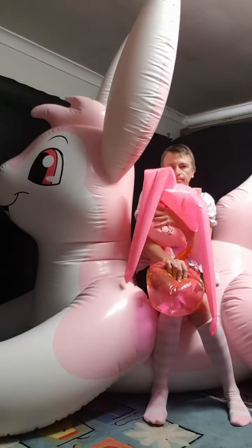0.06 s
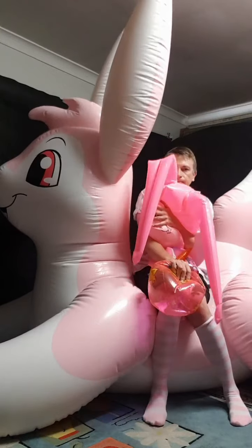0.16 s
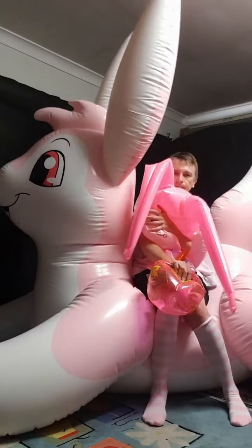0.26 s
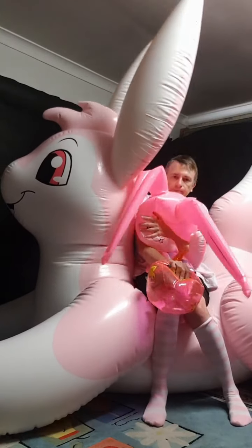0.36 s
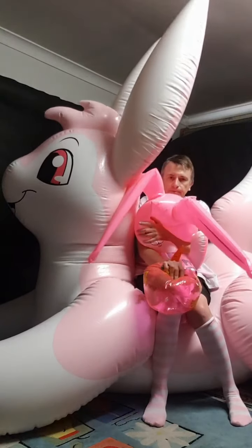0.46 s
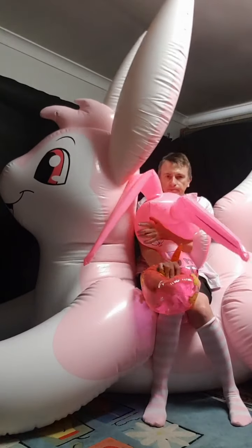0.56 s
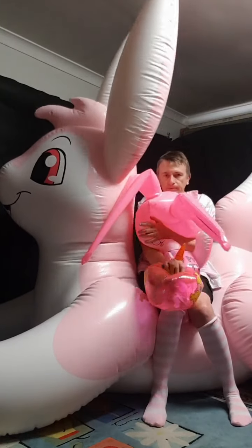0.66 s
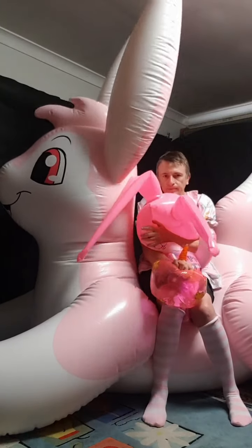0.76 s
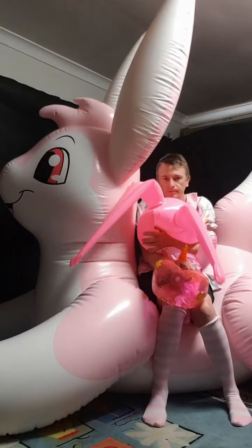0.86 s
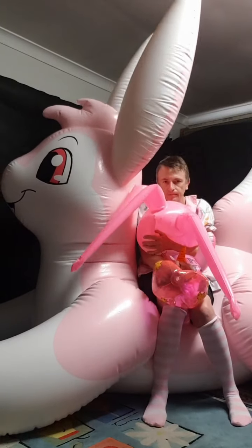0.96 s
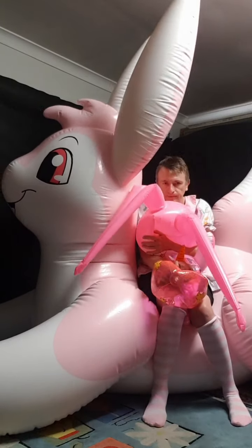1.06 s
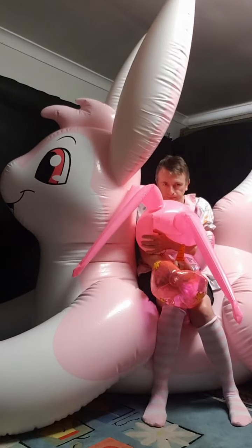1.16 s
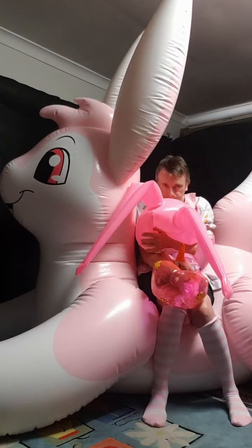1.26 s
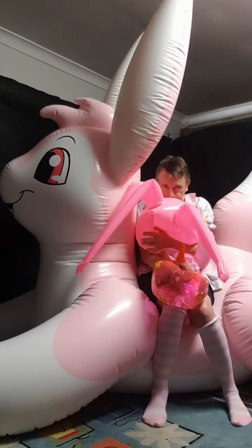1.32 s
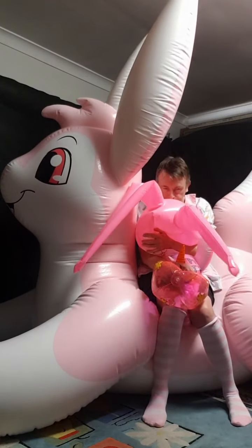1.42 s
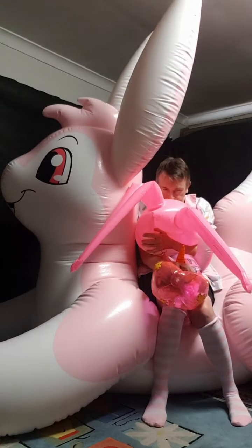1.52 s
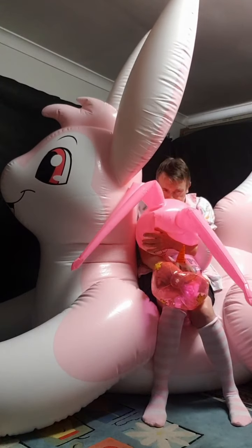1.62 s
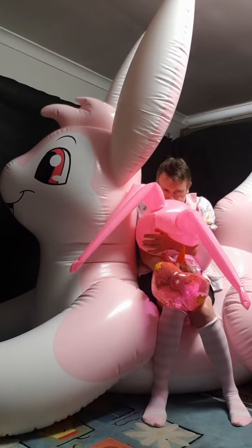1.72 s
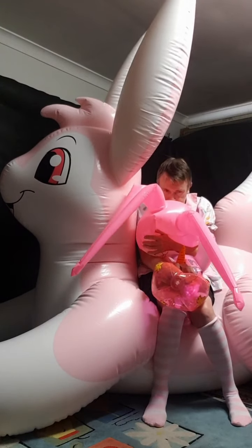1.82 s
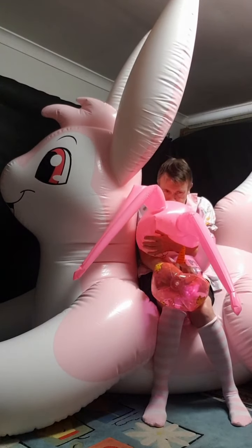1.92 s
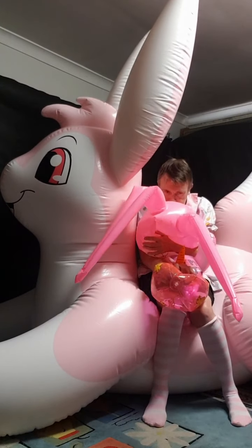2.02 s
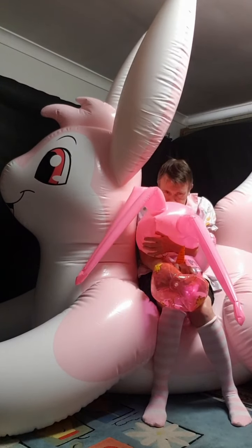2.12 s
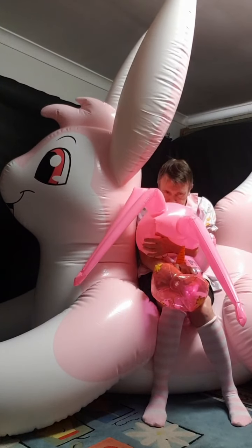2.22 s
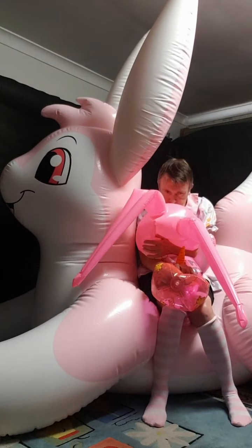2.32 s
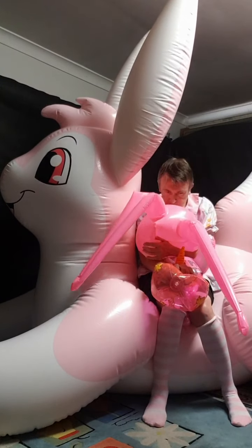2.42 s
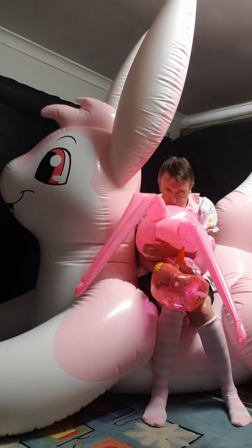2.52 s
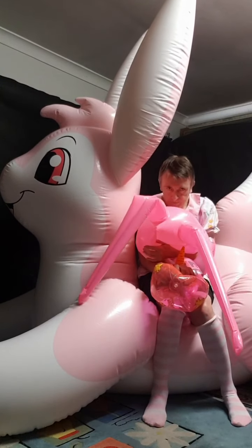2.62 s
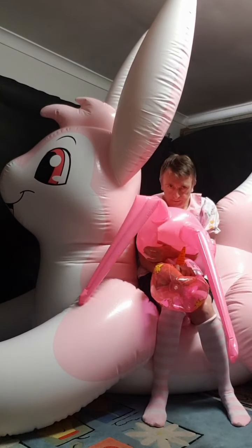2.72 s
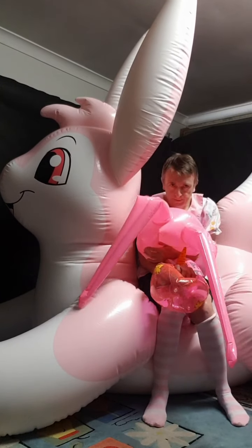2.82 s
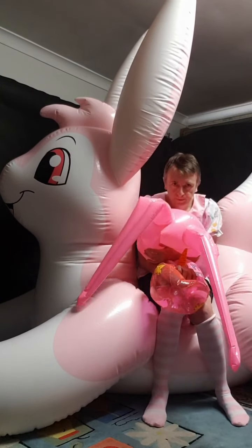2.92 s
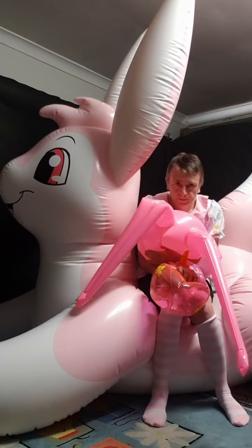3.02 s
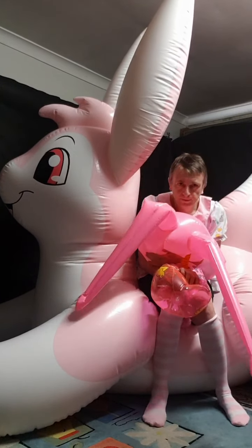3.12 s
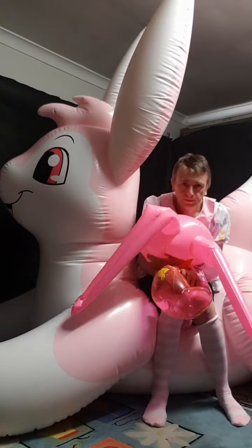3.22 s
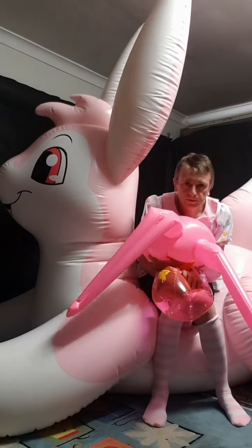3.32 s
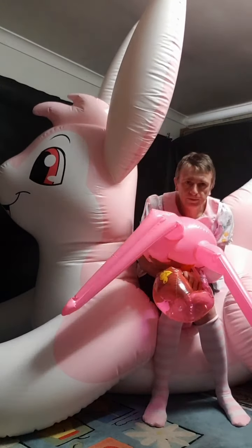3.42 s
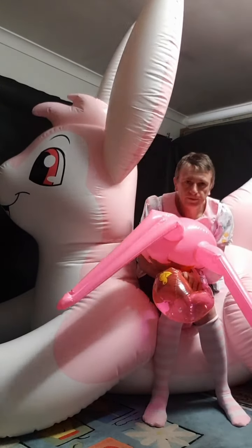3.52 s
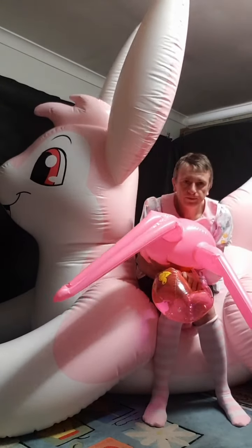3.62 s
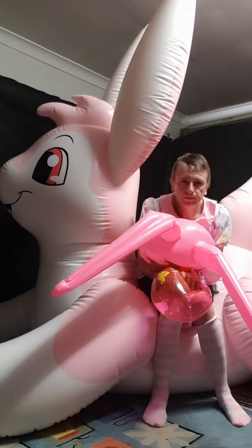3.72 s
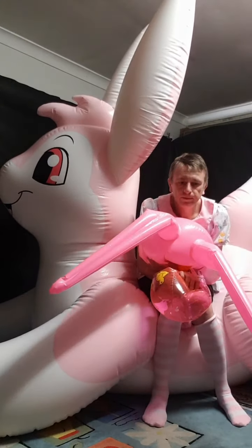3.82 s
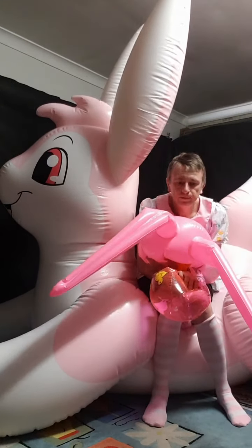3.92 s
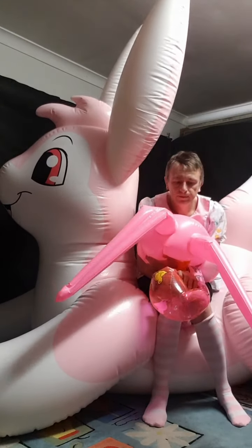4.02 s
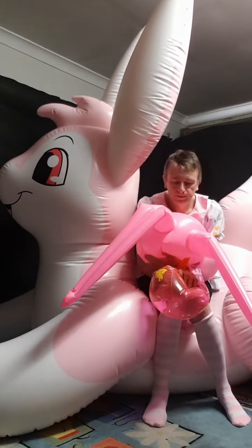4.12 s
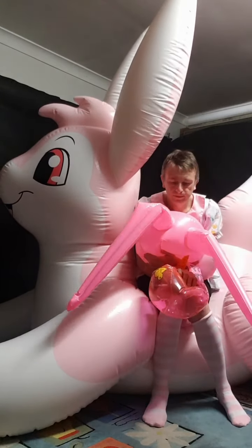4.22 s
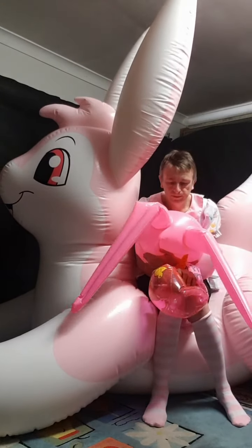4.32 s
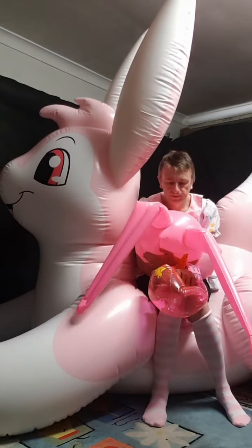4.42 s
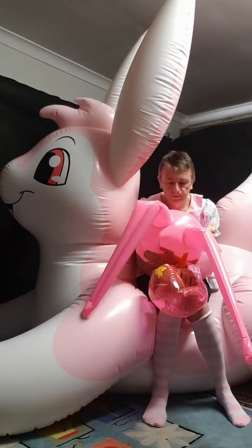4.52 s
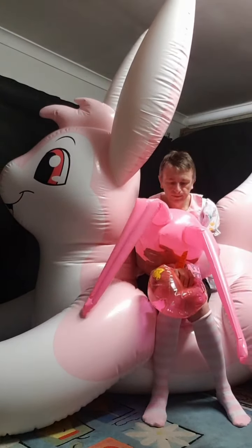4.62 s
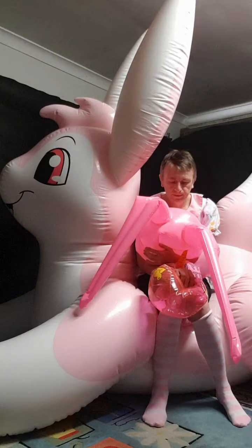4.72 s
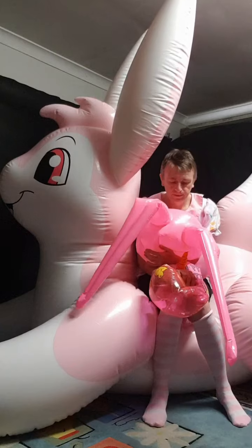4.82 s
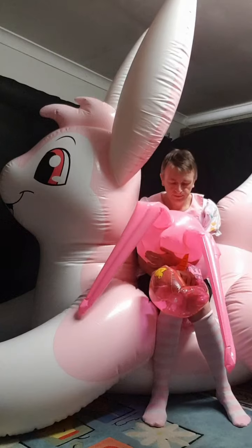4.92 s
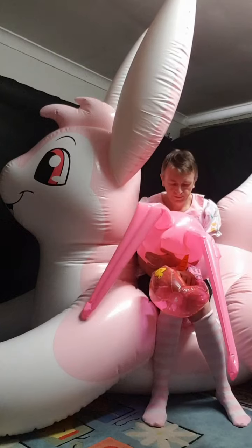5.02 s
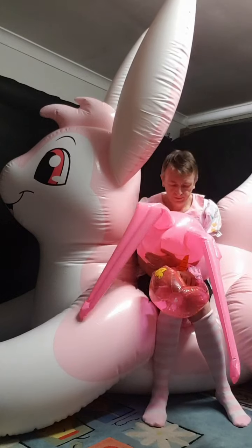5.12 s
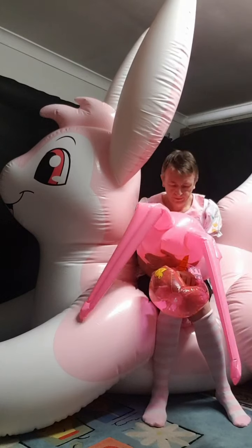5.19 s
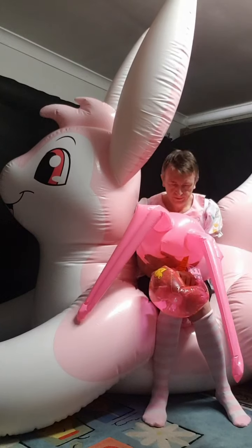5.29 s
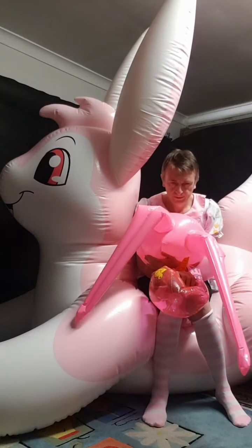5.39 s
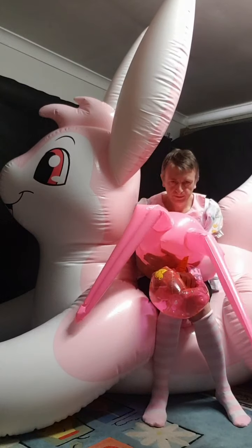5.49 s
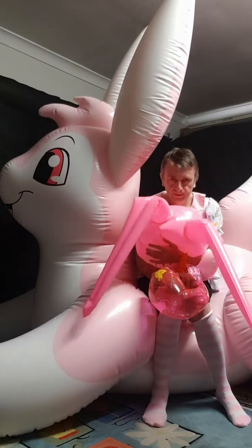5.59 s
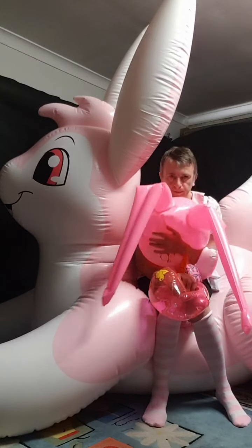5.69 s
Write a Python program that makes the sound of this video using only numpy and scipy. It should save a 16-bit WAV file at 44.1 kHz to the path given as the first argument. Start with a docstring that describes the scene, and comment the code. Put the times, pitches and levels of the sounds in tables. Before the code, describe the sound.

A soft inflatable vinyl toy is squeezed in a small room with a short reverberation, picked up close in stereo. It opens with a low bump and faint, wavering peeps in the first quarter second, over continuous airy hiss and rustle. Dull skin thumps recur until about 1.4 s, with clearer little squeaks around 0.85 to 1.55 s and a faint peep near 2 s, as handling calms. At 2.2 s a thin whistle starts and climbs quickly; near 2.8 s it jumps to a piercing higher pitch, peaks around 3.3 s, then slides down, breaking back to the lower pitch just after 4 s and stopping by 4.3 s. Heavy, dense thuds crowd 3.05 to 3.55 s. Afterwards come breathy hiss, a crease tick at 4.4 s and soft thumps around 4.5 to 4.65 s. A thin, nearly steady squeak lasts from 4.9 to 5.5 s, then rustle and a last soft bump at 5.7 s.

```python
"""Squeezed vinyl inflatable

A soft vinyl inflatable is squeezed in a small room.
Air forced through its valve excites edge tones that whistle and jump between stages;
turbulent air hisses, coloured by the resonances of the valve tube.
The slack skin thumps and rumbles as a loosely stretched membrane, and small creases tick as it buckles."""
import sys
import numpy as np
from scipy import signal
from scipy.fft import rfft, irfft
from scipy.io import wavfile

SR = 44100
rng = np.random.default_rng(int(sys.argv[2]) if len(sys.argv) > 2 else 0)


def put_to_file(sound):
    """Save the sound as 16-bit audio at rate SR, in the file named by the first command-line argument."""
    columns = np.atleast_2d(sound).T  # one column per channel
    safe = np.clip(columns, -1, 1)
    whole_steps = np.round(safe * 32767)
    wavfile.write(sys.argv[1], SR, whole_steps.astype(np.int16))


N = 253575

# Big squeeze, pitch of the low stage, set by jet speed: (time [s], pitch [Hz])
SQUEEZE_PITCH = [(2.222, 2045), (2.27, 2400), (2.334, 2935), (2.394, 3075), (2.452, 3250), (2.526, 3270),
                 (2.634, 3484), (2.76, 3485), (2.785, 3610), (2.8, 3510), (2.9, 3660), (3.125, 3745),
                 (3.158, 3980), (3.198, 4110), (3.29, 4525), (3.365, 4495), (3.5, 4347), (3.69, 4240),
                 (3.742, 4185), (3.76, 4048), (3.86, 3946), (3.94, 3680), (4.005, 3633), (4.056, 3230),
                 (4.11, 3094), (4.21, 2895), (4.28, 2620)]
# When each stage sounds: (start [s], end [s])
LOW_STAGE_SPANS = [(2.222, 2.8), (4.05, 4.28)]
HIGH_STAGE_SPANS = [(2.785, 4.088)]
# Strength of each stage by pitch: (pitch [Hz], 1st partial [dB], 2nd partial [dB])
LOW_STAGE_LEVELS = [(2050, -58, -84), (2380, -53, -68), (2650, -50.5, -60), (3026, -48, -39.5),
                    (3100, -58, -39.5), (3260, -67, -40.5), (3490, -74, -36.5)]
HIGH_STAGE_LEVELS = [(4350, -51, -74), (4570, -43.5, -52), (4900, -45, -57.5), (5100, -30.5, -48.5),
                     (5170, -37, -48), (5610, -30.5, -45), (5920, -27, -42), (6590, -26, -38)]
# Weak peeps of small squeezes:
# (start [s], length [s], first pitch [Hz], last pitch [Hz], 1st partial [dB], 2nd partial [dB])
SMALL_PEEPS = [(0.046, .09, 1200, 1740, -70, -83), (.12, .05, 1810, 2080, -62, -77),
               (.142, 0.078, 1754, 1690, -59.5, -61.5), (0.844, 0.06, 2830, 2820, -58.5, -61.5),
               (0.925, 0.14, 2930, 2793, -48, -56), (1.063, 0.091, 3310, 3134, -56, -54.5),
               (1.13, .05, 2680, 2250, -60.5, -78), (1.291, 0.076, 1770, 2010, -64.5, -82),
               (1.345, .195, 2220, 2115, -60.5, -78), (1.487, 0.074, 1800, 1654, -63, -87),
               (1.772, .06, 1620, 1920, -62, -83), (1.83, 0.4, 1780, 1750, -65.5, -82),
               (1.92, 0.15, 3010, 2910, -81, -66)]
# Last, long squeak: (time [s], pitch [Hz], 1st partial [dB], 2nd partial [dB])
FINAL_SQUEAK = [(4.93, 2680, -62, -70), (4.999, 2952, -52.5, -53), (5.1, 2956, -53.5, -53),
                (5.3, 2924, -70, -51.5), (5.4, 2922, -66, -56), (5.485, 2884, -47.5, -52),
                (5.54, 2780, -65, -68)]
# Half-formed whistles, noise in a moving band:
# (start [s], length [s], first centre [Hz], last centre [Hz], level [dB])
BREATHY_WHISTLES = [(.5, .1, 3560, 3460, -61.5), (.89, 0.065, 3350, 3500, -56),
                    (2.4, 0.51, 2910, 2885, -62.5), (2.4, 0.43, 3480, 3500, -60),
                    (2.5, 0.35, 3870, 4180, -59.5), (4.07, 0.17, 3420, 3410, -58.5),
                    (4.199, 1.2, 1199, 1152, -62), (5.24, 0.25, 3283, 3350, -54.5)]
# Air pressed out of the toy: (time [s], rustle level [dB])
AIR_LEVEL = [(0.0, -65.5), (0.18, -60), (0.33, -64), (0.43, -57), (0.57, -53), (0.69, -56.5), (0.88, -53.5),
             (1.06, -61.5), (2.13, -61), (2.66, -57), (2.91, -56.5), (3.33, -49.5), (3.49, -52.5),
             (3.78, -56), (4.2, -57), (4.5, -54), (4.69, -56), (5.06, -53), (5.32, -57), (5.52, -57),
             (5.75, -53.5)]
# Relative spectra of crease rustle and valve jet: (frequency [Hz], density [dB per Hz])
RUSTLE_SPECTRUM = [(240, -47), (400, -17), (573, -3), (821, -4), (972, -15), (1720, -9), (2710, -7.5),
                   (5000, -15.5), (6500, -9), (11000, -120)]
JET_SPECTRUM = [(1180, -41), (2000, -4.5), (2360, -8.5), (2710, -36), (2950, 2.5), (3190, -8), (5410, 2.5),
                (8330, -9.5), (10100, -13.5), (13800, 5.5), (15800, 1.5)]
# Valve tube and microphone resonances: (frequency [Hz], width [Hz], boost over the hiss [dB])
TUBE_RESONANCES = [(680, 39, 2), (1150, 117, 16), (1770, 83, 10), (2290, 200, 5.5), (2934, 32, 5.5),
                   (3440, 116, 5.5), (5500, 600, 2), (10050, 600, 13)]
# Motion of the skin under the arms: (time [s], deep sway level [dB], drumming level [dB])
SKIN_LEVELS = [(0.0, -35.5, -51.5), (0.09, -64, -57.5), (0.26, -45.5, -49), (0.48, -51.5, -49.5),
               (0.78, -58.5, -45), (1.0, -53.5, -52), (1.2, -75, -66), (1.41, -61, -52.5), (1.6, -68, -71),
               (2.24, -75, -75), (2.37, -57.5, -55.5), (2.98, -47.5, -48), (3.48, -33, -35.5),
               (3.54, -47.5, -51), (3.92, -74, -70), (4.29, -52, -48.5), (4.39, -57, -55),
               (4.63, -53, -51.5), (4.84, -78, -63.5), (5.03, -63, -59.5), (5.12, -82, -80.5),
               (5.75, -45, -48.5)]
# Relative spectrum of the pushes on the skin: (frequency [Hz], density [dB per Hz])
RUMBLE_SPECTRUM = [(15, -52), (25, -22.5), (64, -1.5), (119, -6), (182, -10), (224, -3), (253, -7),
                   (375, -10), (615, -13), (977, -24.5), (1140, -18), (1500, -33.5), (1950, -67),
                   (3300, -120)]
# Skin snapping taut: (time of the swing's centre [s], level [dB], frequency [Hz])
SKIN_SNAPS = [(0.002, -30, 166), (0.238, -44, 190.0), (0.272, -37, 151), (0.66, -38, 200.0),
              (0.703, -35, 140.0), (0.866, -58, 120.0), (1.014, -32.5, 190.0), (1.037, -40.5, 100.0),
              (1.378, -40, 407), (2.84, -41, 184), (3.066, -31.5, 260), (3.167, -30.5, 177),
              (3.193, -29, 169), (3.286, -23, 111), (3.337, -20.5, 227), (3.38, -18.5, 189),
              (3.436, -20.5, 132), (3.469, -18, 118), (3.495, -28.5, 156), (3.563, -32, 144),
              (4.507, -41, 107), (4.565, -42, 184), (4.635, -40.5, 110.0), (5.699, -39, 93)]
# Creases: (time [s], level before the band-pass [dB])
CREASE_TICKS = [(0.4504, -46), (0.779, -47), (0.804, -41), (0.8694, -58), (1.285, -48.5), (1.5744, -47),
                (1.731, -50), (1.9867, -48), (3.7701, -35), (4.3999, -41)]
# Left-right likeness of the diffuse sources: (frequency [Hz], correlation [0-1])
STEREO_LIKENESS = [(60, 0.96), (250, 0.93), (500, 0.51), (2000, 0.24), (8000, 0), (14000, 0.012)]
# Balance of the two ports: (frequency [Hz], left over right [dB])
PORT_BALANCE = [(60, -2.5), (200, -1), (700, 0), (2400, 1), (4400, 3.5), (6300, 0), (8100, -5),
                (15000, -10)]

HIGH_STAGE_RATIO = 1.38   # pitch of the high stage over the low one
EASING_S, EASING_DB = 3.84, -5   # the big squeeze's tone is weaker once the grip eases
PEEP_ATTACK_S, PEEP_RELEASE_S = 0.015, 0.02
PEEP_WAVER_HZ = 30   # weak jets hold their pitch less well
BREATHY_FADE_SHARE = 0.32   # of the length, at each end
JET_DB, TOP_HISS_DB = -17.5, 7   # jet (7.6-9.4 kHz) against the rustle; top hiss against the jet
VALVE_OPENS_S, OPENING_S, OPEN_JET_DB = 2.39, .4, 5.5   # the valve opens wider, the jet stays stronger
SMALL_THUMPS_PER_S, SMALL_THUMP_DB, SMALL_THUMP_HZ = 8, 6.5, 150   # mean rate; medians, dB over drumming
ROOM_T60_S, ROOM_DB = 0.17, -2   # decay time; tail energy against the direct sound
LEFT_LAG_S, CUTOFF_HZ = 3.5e-5, 15780


def whistles():
    """Edge tones: a jet striking an edge oscillates nearly sinusoidally; turbulence makes it waver."""
    flutter = from_db(2.57 * drift(84) + 1.22 * drift(14))
    loose_hz = PEEP_WAVER_HZ * drift(71.6)
    tones = big_squeeze() + small_peeps(loose_hz) + final_squeak(loose_hz) + breathy_whistles()
    return tones * flutter


def big_squeeze():
    """Stage jumping: one jet speed supports two stages of edge tone, a fixed pitch ratio apart."""
    out = np.zeros(N)
    waver = 1 + 0.00364 * drift(54)
    low_hz, = in_time(SQUEEZE_PITCH)
    easing = from_db(EASING_DB * gate(EASING_S, N / SR + 1, .15, 1))
    stages = [(low_hz, LOW_STAGE_SPANS, LOW_STAGE_LEVELS),
              (HIGH_STAGE_RATIO * low_hz, HIGH_STAGE_SPANS, HIGH_STAGE_LEVELS)]
    for hz, spans, levels in stages:
        pitch, first_db, second_db = np.transpose(levels)
        tone = edge_tone(hz * waver, np.interp(hz, pitch, first_db), np.interp(hz, pitch, second_db))
        sounding = sum(gate(start, end, 0.0044, 0.029) for start, end in spans)
        out += sounding * easing * tone
    return out


def small_peeps(loose_hz):
    """Weak excitation: brief edge tones glide and hold their pitch loosely."""
    out = np.zeros(N)
    for start, length, first_hz, last_hz, first_db, second_db in SMALL_PEEPS:
        shape = gate(start, start + length, PEEP_ATTACK_S, PEEP_RELEASE_S)
        on = shape > 0
        hz = glide(start, length, first_hz, last_hz) + loose_hz
        out[on] += shape[on] * edge_tone(hz[on], first_db, second_db)
    return out


def final_squeak(loose_hz):
    """Sustained edge tone: the balance of its partials shifts over its course while the pitch holds nearly
    steady."""
    hz, first_db, second_db = in_time(FINAL_SQUEAK)
    shape = gate(FINAL_SQUEAK[0][0], FINAL_SQUEAK[-1][0], PEEP_ATTACK_S, PEEP_RELEASE_S)
    return shape * edge_tone(hz + loose_hz, first_db, second_db)


def breathy_whistles():
    """Quadrature modulation: noise on both phases of a carrier is a band of noise around it."""
    out = np.zeros(N)
    for start, length, first_hz, last_hz, level_db in BREATHY_WHISTLES:
        phase = 2 * np.pi * np.cumsum(glide(start, length, first_hz, last_hz)) / SR
        noise = drift(87) * np.sin(phase) + drift(200) * np.cos(phase)
        fade = BREATHY_FADE_SHARE * length
        out += gate(start, start + length, fade, fade) * from_db(level_db) * noise
    return out


def edge_tone(hz, first_db, second_db):
    """Harmonic series: four partials, the 3rd and 4th following the 1st and 2nd in level."""
    phase = 2 * np.pi * np.cumsum(hz) / SR
    levels = [first_db, second_db, first_db - 27, second_db - 25]
    return sum((hz * k < .4 * SR) * from_db(db) * np.sin(k * phase) for k, db in enumerate(levels, 1))


def air():
    """Turbulence noise: crease rustle and jet hiss, both filtered by the tube resonances."""
    rustle_db, = in_time(AIR_LEVEL)
    jet_db = rustle_db + JET_DB + OPEN_JET_DB * gate(VALVE_OPENS_S, N / SR + 1, OPENING_S, 1)
    top_db = jet_db + TOP_HISS_DB
    rustle = stereo_colour(grains(4000, 1.3), RUSTLE_SPECTRUM)
    rustle = patchy(rustle, [300, 900, 1500, 2600, 7000], 1.3)
    jet = stereo_colour(rng.standard_normal((2, N)), JET_SPECTRUM)
    body = patchy(jet, [1500, 4500, 7000, 11500], 1.1)
    body /= np.std(band(jet, 7600, 9400))
    top = rms_one(band(jet, 11500, 18000))
    gusts = from_db(0.98 * drift(18))
    hiss = from_db(rustle_db + 0.72 * drift(15)) * rustle
    hiss += gusts * (from_db(jet_db) * body + from_db(top_db) * top)
    return hiss + sum((from_db(db) - 1) * resonance(hiss, hz, width) for hz, width, db in TUBE_RESONANCES)


def skin():
    """Forced membrane: dense soft pushes drum on the slack skin; snaps stand out as short swings."""
    deep_db, drum_db = in_time(SKIN_LEVELS)
    pushes = stereo_colour(grains(900, 1.93), RUMBLE_SPECTRUM)
    pushes += .5 * resonance(pushes, 218.6, 16)   # air body of the toy
    deep = rms_one(band(pushes, 11, 139.0))
    drum = rms_one(band(pushes, 146, 2660))
    rumble = from_db(deep_db + 1.04 * drift(12)) * deep
    rumble += from_db(drum_db + 1.43 * drift(18.4)) * drum
    return rumble + thumps(drum_db)


def thumps(drum_db):
    """Heavily damped oscillation: each snap swings for about two cycles; small ones fall at random."""
    small = []
    for at in np.flatnonzero(rng.random(N) < SMALL_THUMPS_PER_S / SR):
        level_db = drum_db[at] + SMALL_THUMP_DB + rng.normal(0, 3.8)
        small.append((at / SR, level_db, SMALL_THUMP_HZ * 2 ** rng.normal(0, 0.74)))
    margin = SR // 20   # room for swings that begin before their centre
    out = np.zeros(N + SR)
    t = np.arange(-margin, margin) / SR
    for centre_s, level_db, hz in SKIN_SNAPS + small:
        at = round(centre_s * SR)
        swell = np.exp(-(t * hz / np.where(t < 0, .6, .8)) ** 2)   # quick swell, slower fall
        out[at:at + len(t)] += from_db(level_db) * swell * np.sin(-2 * np.pi * hz * t)
    return out[margin:margin + N]


def creases():
    """Impulsive buckling: each crease gives a bright noise puff that dies in a few ms."""
    clicks = np.zeros(N)
    clicks[[round(s * SR) for s, db in CREASE_TICKS]] = from_db(np.array(CREASE_TICKS)[:, 1])
    decay = signal.lfilter([1], [1, -np.exp(-1 / (0.0023 * SR))], clicks)
    puffs = decay * rng.standard_normal(N)
    return signal.sosfilt(signal.butter(2, [1500, 11000], "band", fs=SR, output="sos"), puffs)


def room(x):
    """Reverberation: a dense decaying tail, different on each side, beats with gliding tones."""
    t = np.arange(SR // 2) / SR
    response = rng.standard_normal((2, len(t))) * from_db(-60 * t / ROOM_T60_S) * (t > .004)
    response *= from_db(ROOM_DB) / np.sqrt(np.sum(response ** 2, axis=1, keepdims=True))
    response[:, 0] = 1   # direct sound
    return signal.fftconvolve(x[None], response, axes=1)[:, :N]


def from_db(db):
    """Logarithmic level: decibels to amplitude gain."""
    return 10 ** (np.asarray(db) / 20)


def rms_one(x):
    """Effective value: scale to rms 1."""
    return x / np.sqrt(np.mean(x ** 2) + 1e-20)


def in_time(rows):
    """Linear interpolation: columns of a time table, one value a sample."""
    s, *columns = np.transpose(rows)
    return [np.interp(np.arange(N) / SR, s, c) for c in columns]


def at_hz(points, hz):
    """Logarithmic frequency axis: read a spectrum table by pitch distance."""
    table_hz, values = np.transpose(points)
    return np.interp(np.log(hz), np.log(table_hz), values)


def glide(start_s, length_s, first_hz, last_hz):
    """Linear frequency sweep: a straight slide of pitch."""
    return in_time([(start_s, first_hz), (start_s + length_s, last_hz)])[0]


def gate(start_s, end_s, attack_s, release_s):
    """Amplitude envelope: 1 between two times, with linear ramps inside them."""
    t = np.arange(N) / SR
    return np.clip(np.minimum((t - start_s) / attack_s, (end_s - t) / release_s), 0, 1)


def drift(rate_hz):
    """Low-pass random process: noise at every 20th sample through a double one-pole filter, rms 1."""
    r = np.exp(-40 * np.pi * rate_hz / SR)
    noise = rng.standard_normal(N // 20 + 4002)
    slow = signal.lfilter([1], [1, -2 * r, r * r], noise)[4000:]   # drop the filter's settling
    return np.interp(np.arange(N) / 20, np.arange(len(slow)), rms_one(slow))


def grains(per_s, spread_db):
    """Shot noise: two trains of random clicks of uneven size and either sign."""
    sizes = from_db(spread_db * np.minimum(rng.exponential(1, (2, N)), 4))
    sizes *= rng.choice([-1, 1], (2, N))
    return sizes * (rng.random((2, N)) < per_s / SR)


def resonance(x, hz, width_hz):
    """Damped resonator: a two-pole peak of gain 1."""
    r = np.exp(-np.pi * width_hz / SR)
    zeros = (1 - r * r) / 2 * np.array([1, 0, -1])
    return signal.lfilter(zeros, [1, -2 * r * np.cos(2 * np.pi * hz / SR), r * r], x)


def band(x, low_hz, high_hz):
    """Band limitation: a steep band-pass."""
    return signal.sosfilt(signal.butter(3, [low_hz, high_hz], "band", fs=SR, output="sos"), x)


def patchy(x, edges_hz, depth_db):
    """Independent modulation: each band of a noise swells and sinks on its own."""
    edges = zip(edges_hz, edges_hz[1:])
    return sum(from_db(depth_db * drift(5.1)) * band(x, low, high) for low, high in edges)


def stereo_colour(pair, spectrum):
    """Partial coherence: unrelated sources mix into left and right with a set likeness, rms 1."""
    hz = np.maximum(np.fft.rfftfreq(N, 1 / SR), 10)
    alike = np.clip(at_hz(STEREO_LIKENESS, hz), 0, 1)
    mid, side = rfft(pair) * from_db(at_hz(spectrum, hz))
    return rms_one(irfft(np.sqrt(1 + alike) * mid + np.sqrt(1 - alike) * side * [[1], [-1]], N))


def leaning(pair):
    """Interaural-like cues: two ports favour different bands, and the left hears a little later."""
    hz = np.maximum(np.fft.rfftfreq(N, 1 / SR), 10)
    side = np.array([[1], [-1]])
    late = np.exp(-1j * np.pi * hz * LEFT_LAG_S * side)
    return irfft(rfft(pair) * from_db(at_hz(PORT_BALANCE, hz) / 2 * side) * late, N)


def scene():
    """Superposition: whistles and ticks in the room, over skin and air."""
    return room(whistles() + creases()) + skin() + air()


def record(dry):
    """Band-limited pickup: two microphone ports, a bass roll-off and a steep cut of the top."""
    ports = signal.sosfilt(signal.butter(1, 30, "high", fs=SR, output="sos"), leaning(dry))
    return signal.sosfilt(signal.ellip(12, .5, 85, CUTOFF_HZ, fs=SR, output="sos"), ports)


dry = scene()
out = record(dry)
put_to_file(out)
```